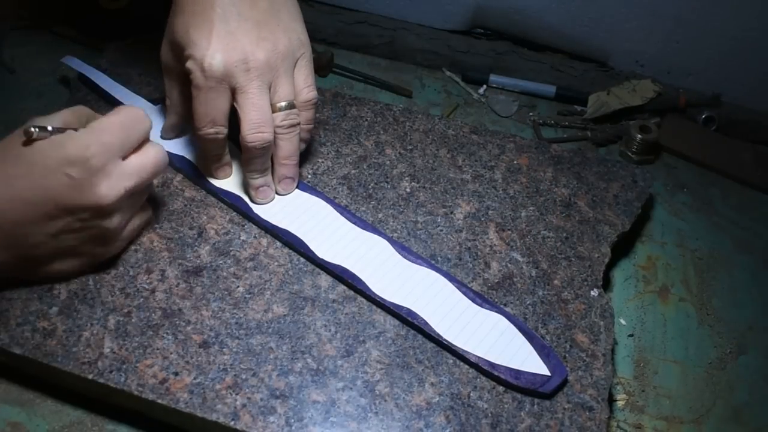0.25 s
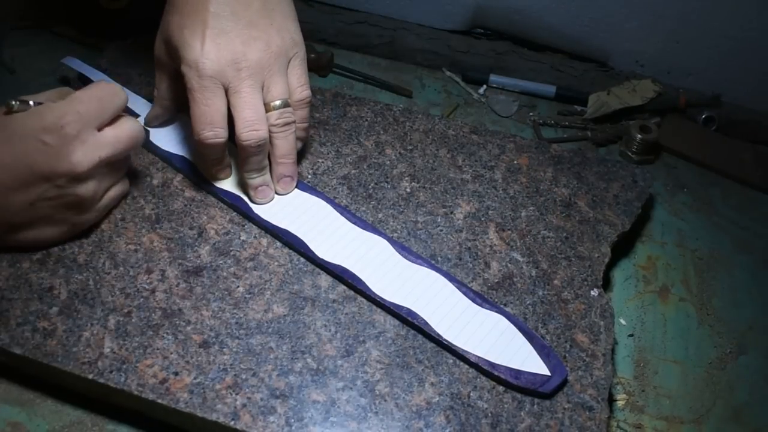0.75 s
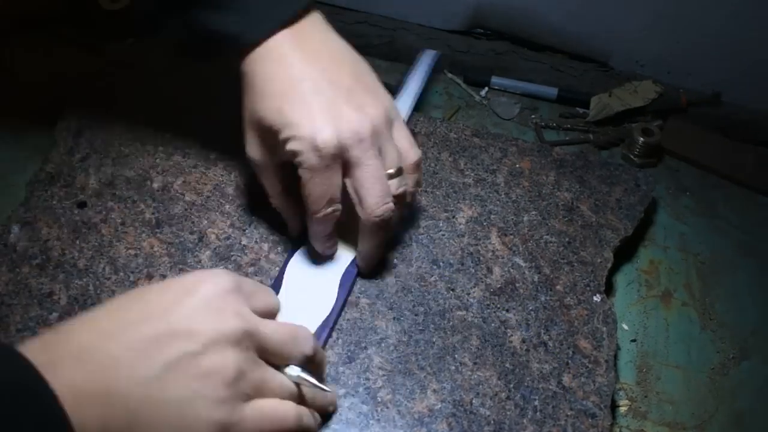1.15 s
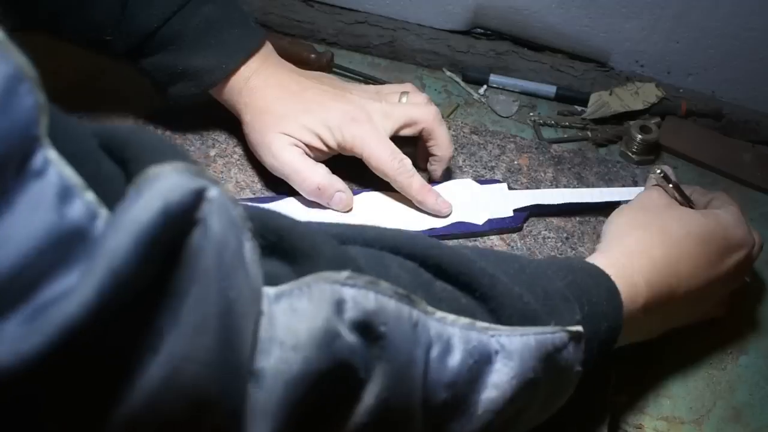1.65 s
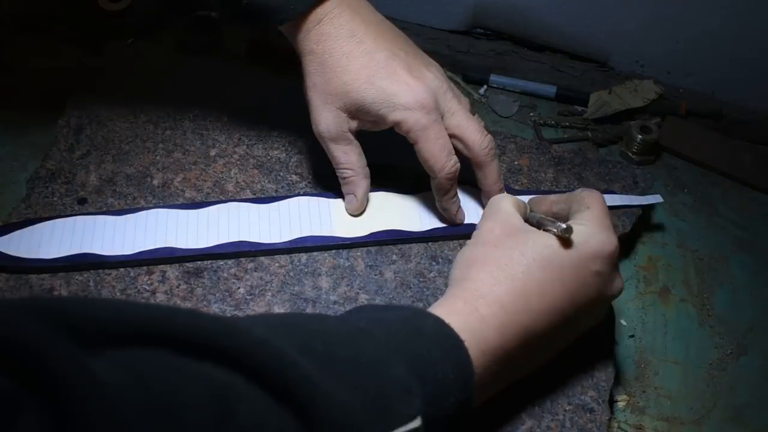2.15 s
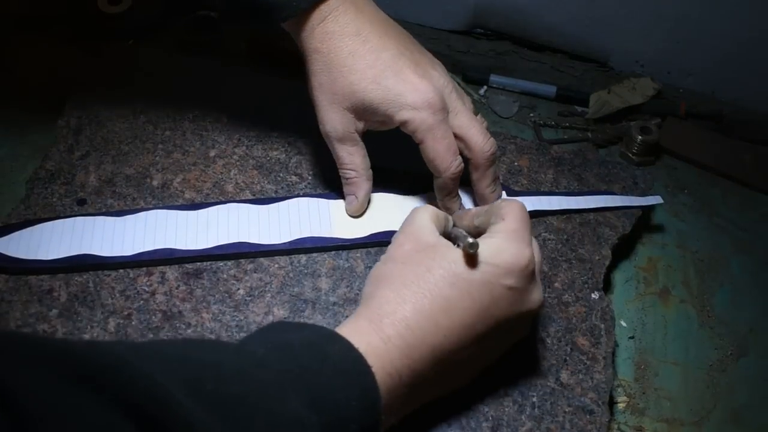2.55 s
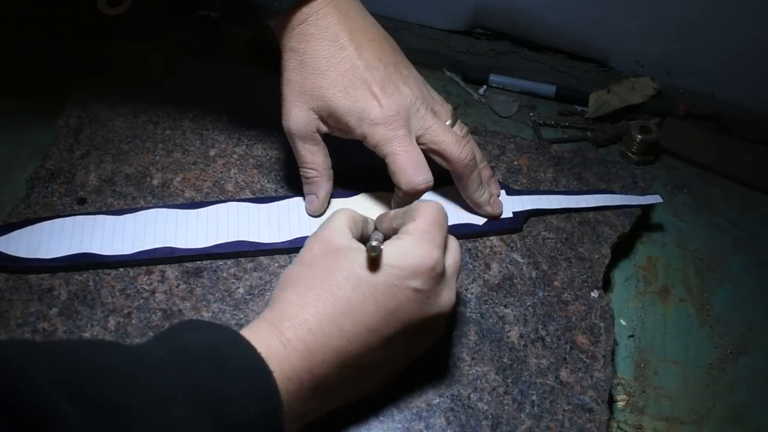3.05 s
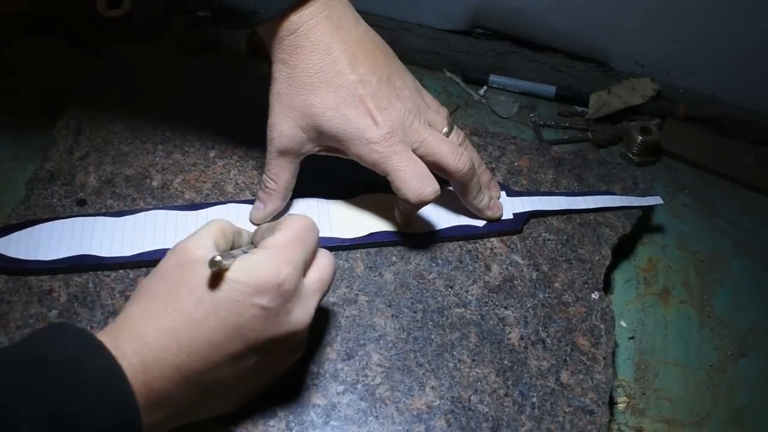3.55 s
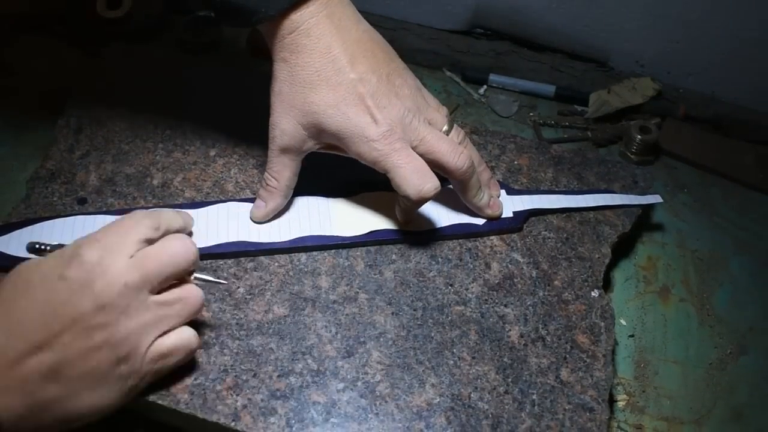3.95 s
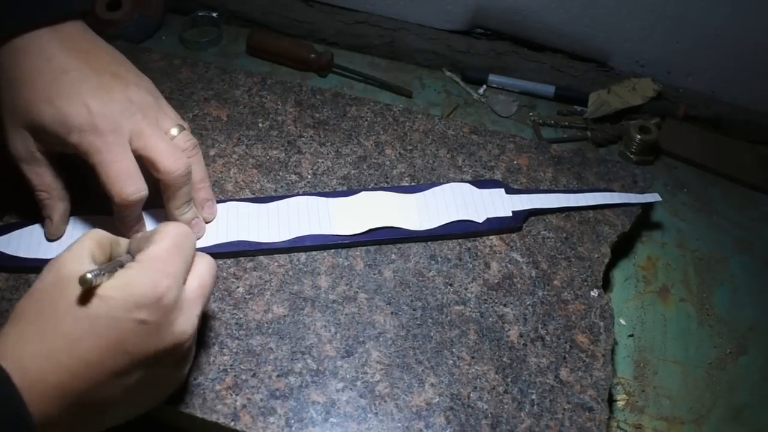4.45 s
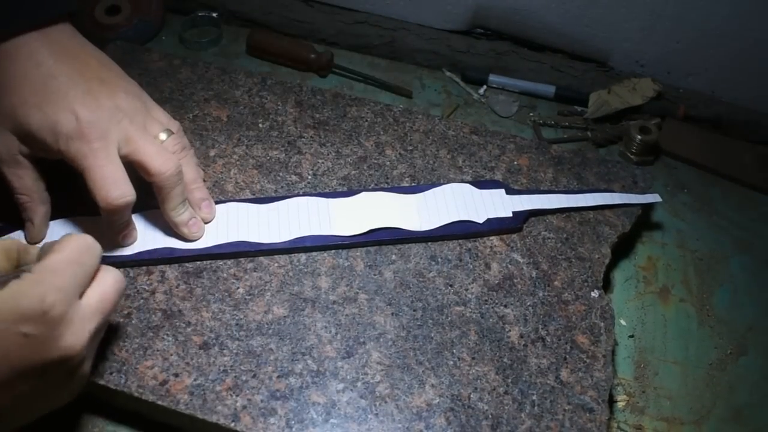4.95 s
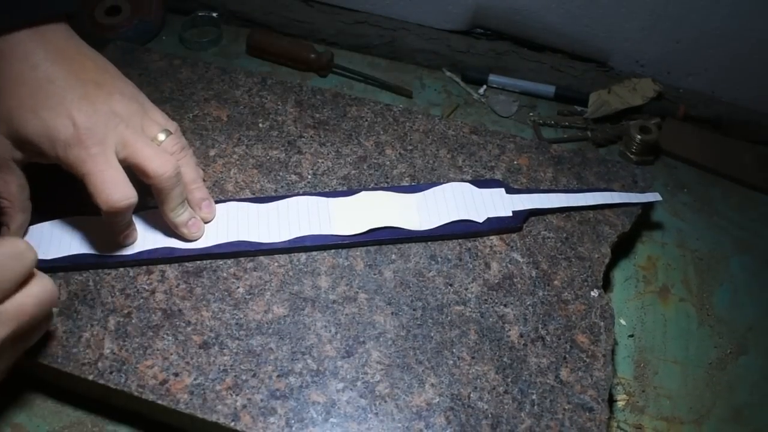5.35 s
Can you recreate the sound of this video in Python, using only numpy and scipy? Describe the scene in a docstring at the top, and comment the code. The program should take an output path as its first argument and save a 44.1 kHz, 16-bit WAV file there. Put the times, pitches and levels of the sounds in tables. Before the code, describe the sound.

Close, dry scratching of a steel point on steel, fast gritty ticking strokes, one loud metallic clack, light bench taps, piercing chirps at the end.

```python
"""Close by in a small, quiet workshop, a metal scribe traces a template on a steel blank under a rustling sleeve.
Stick-slip friction at the point gives bursts of modulated noise, which excite the resonances of the steel.
At about one second the blank slides, skids and is swung round with a clack: impulses and a rattle through modes.
Then it taps the bench in double knocks of damped modes, fingers creak in rising tones, and long strokes follow.
At last the hand drags in low filtered noise, and near the tip the slips squeak as short wavering harmonic tones."""
import sys
import numpy as np
from scipy import signal
from scipy.fft import rfft, irfft
from scipy.io import wavfile
from scipy.ndimage import uniform_filter1d

SR = 44100
rng = np.random.default_rng(int(sys.argv[2]) if len(sys.argv) > 2 else 0)


def store_wav(level_fs):
    """Save 16-bit WAV to argv[1]."""
    pcm = np.round(np.clip(np.atleast_2d(level_fs), -1, 1) * 32767)
    wavfile.write(sys.argv[1], SR, pcm.T.astype(np.int16))


N = 246519
TIME = np.arange(N) / SR  # s
BINS = np.arange(2049) * SR / 4096  # Hz

# Levels in the tables are relative: they come ahead of the filters and of each source's trim.
# width_hz is the full width of a resonance at half its amplitude; length_ms is that of a burst at half power.

# Spectrum of the workshop air: hz, density_db (per Hz)
AIR_SPECTRUM = [(20, 9), (45, -3), (80, -8), (120, -23), (250, -27), (420, -7), (700, -3), (1400, -3.5),
                (2300, -2.5), (4000, -6), (7000, -3.5), (15500, -11.5)]
AIR_DB = -66.5
# Resonances of the sleeve cloth: hz, width_hz, level_db
CLOTH_MODES = [(687, 240, -12.5), (1466, 620, -6), (3480, 790, -2.5), (4210, 3200, -9), (8260, 4600, -17),
               (13300, 3200, -11)]
# Swishes of the sleeve as the arm shifts: top_s, level_db, length_ms
SWISHES = [(0.5, -71, 250), (1.08, -67, 60), (1.28, -67, 50), (1.41, -66, 110), (1.6, -67, 50),
           (1.89, -68, 50), (2.17, -68, 170), (2.41, -67, 60), (3.17, -66, 120), (3.92, -68, 160),
           (4.19, -67, 70), (4.6, -70, 150), (4.98, -65, 150), (5.33, -70, 150)]
SLEEVE_DB = -73  # the sleeve never quite rests

# The point feels for the template's edge with faint ticks: start_s, end_s, rate_per_s, level_db
FEELING = [(0.0, 0.96, 14, -57), (2.02, 2.73, 8, -59)]
# The point is set down or touches in passing, and at 4.012 s the blank knocks sharply on the bench: top_s,
# level_db, length_ms
TOUCHES = [(0.024, -45, 10.6), (0.371, -49, 2.7), (0.388, -51, 4.8), (0.421, -43, 1.8), (0.434, -49, 5),
           (0.462, -43.5, 1.4), (0.473, -49, 8.4), (0.517, -50, 1.3), (0.974, -42, 3), (0.983, -45, 7),
           (1.447, -47.5, 5.8), (1.504, -38, 5.1), (1.546, -38.5, 2), (1.566, -39, 2.3),
           (1.575, -43.5, 4.9), (1.752, -43.5, 4.4), (2.243, -44.5, 5.4), (2.351, -48.5, 3.1),
           (2.821, -47, 5), (4.012, -33.5, 0.77)]
# Strokes, each a run of stick and slip: first_slip_s, last_slip_s, first_level_db, last_level_db,
# slip_length_ms, catch_level_db (re the slips)
STROKES = [(0.100, 0.243, -40.5, -39.5, 5.6, -7), (0.569, 0.665, -36.5, -41.5, 5.5, -4),
           (0.751, 0.777, -42.5, -52, 5, 3), (0.828, 0.902, -39, -37, 4.5, 1),
           (1.926, 2.019, -48, -41, 5, -12), (2.078, 2.099, -45.5, -43.5, 4.5, -6),
           (2.173, 2.203, -55, -55, 4, -8), (2.465, 2.606, -44, -50, 5.5, -10),
           (2.662, 2.686, -47.5, -49, 4.7, -9), (2.857, 3.921, -46.5, -46.5, 5.2, -8),
           (4.272, 4.488, -44.5, -45, 6, -6), (4.544, 4.620, -45.5, -43, 5.3, -6),
           (4.693, 4.742, -44, -45, 5.5, -9), (4.811, 4.967, -41.5, -45, 7, -7),
           (5.030, 5.135, -39, -41, 5, -9), (5.280, 5.334, -37.5, -34, 2.8, -10),
           (5.390, 5.438, -39, -35.5, 3, -10), (5.487, 5.537, -42, -36, 4, -7)]
# Pace of slipping, slower in the bends of the outline and towards the tip: time_s, slips_per_s
PACE = [(0, 42), (2.65, 42.5), (2.85, 46), (3.22, 46), (3.29, 41), (3.45, 41.3), (3.51, 46.5), (3.65, 44.5),
        (3.71, 39.5), (4.4, 41.5), (4.85, 38.5), (5.5, 39.5)]
# Harder or lighter bearing of the hand in the long stroke: time_s, change_db
PRESS = [(2.86, 0), (3.1, 3.5), (3.15, -3), (3.33, 2.5), (3.46, 2.5), (3.52, -2.5), (3.62, 3.5), (3.9, 3.2),
         (4.0, 0)]
SLIP_SCATTER_DB, LENGTH_SCATTER = .9, .15  # spread of the level and of the log length of slips
CATCH_MS, CATCH_SCATTER_DB = 3.0, 2  # typical length and level spread of the light catches
CATCH_SHARE = .49  # a catch comes about this share of the way to the next slip
# Skids of the point while the blank is swung round: top_s, level_db, rise_db_per_ms, fall_db_per_ms
SKIDS = [(1.140, -43, .75, .2), (1.142, -26, 6, .7), (1.213, -22.5, 3, 1.3), (1.226, -34, 1, .5)]
# Spans of steady grip at tang, turn, shoulder, middle and tip: start_s, end_s
PLACES = [(0, 1.0), (1.1, 1.8), (1.9, 3.35), (3.7, 4.05), (4.25, 5.6)]
# Resonances of scribe and blank: hz, width_hz, tang_db, turn_db, shoulder_db, middle_db, tip_db
STEEL_MODES = [(710, 164, -20, -36, -12, -20, -27), (1480, 620, -20.5, -19, -14, -16, -14),
               (2477, 354, -22, -12.5, -18.5, -23, -12), (3790, 2100, -37, -17, -21.5, -20.5, -15),
               (5560, 520, -55, -14, -17.5, -20, -1), (6430, 273, 4, 3.5, 3.5, 4, 5),
               (6950, 660, -4, -3.5, -36, -8, -26), (7410, 1050, -14.5, -15, -9, -10, -15),
               (9110, 1050, -18, -14.5, -13, -15, -6.5), (10370, 630, -11, -13, -6, -7.5, 1.5),
               (11095, 340, -2.5, -5, -3.5, -16, 2.5), (12040, 330, -5, 0, -5, -4, 2),
               (12480, 520, -20, 3.5, 4.5, 1, -.5), (13550, 560, -30, -5, 1.5, 0, -11),
               (14550, 600, -25, -6, -7, -6, -8.5), (15570, 340, -8.5, 4.5, 1.5, -8, -7)]
# Low bending modes of the blank, which ring on between slips: hz, width_hz, level_db
BENDING_MODES = [(430, 110, -16), (670, 220, -5), (1140, 260, -1), (1400, 400, 1), (1720, 300, -6)]
# How freely the blank bends along the blade: time_s, level_db (re the slips)
BENDING_FREEDOM = [(0, -19.5), (1.2, -25.5), (2.0, -12), (2.9, -12.5), (3.4, -9), (3.9, -14.5),
                   (4.4, -11.5), (5.0, -9.5), (5.5, -9.5)]

# The blank slides on its flat side during the turn: time_s, level_db
SLIDE = [(1.0, -100), (1.06, -62.5), (1.11, -67), (1.14, -39.5), (1.165, -53), (1.2, -79), (1.25, -100)]
# Contacts as the blank comes down hard and bounces: time_s, level_db
CLACKS = [(1.2014, -13.5), (1.2022, -24.5), (1.2027, -24), (1.2101, -29), (1.2142, -36)]
# Resonances of the clack's blow: hz, width_hz, level_db
CLACK_MODES = [(260, 320, -50), (694, 630, -21.5), (1680, 360, -2), (2780, 320, -0.5), (3155, 350, 6.5),
               (4340, 1500, -10.5), (5650, 560, 1.5), (6700, 510, 0.5), (7830, 440, 1), (9150, 1300, -6.5),
               (12900, 5000, -10)]
# After-ring of the clack: hz, level_db, t60_s
CLACK_RING = [(1007, -39, .12), (1665, -34, .03), (2831, -30, .025), (6449, -33, .08)]
# The blank tips under the hand and taps the bench: time_s, level_db
TAPS = [(1.369, -50.5), (1.5452, -46.5), (1.5855, -45), (1.642, -55), (1.8418, -40), (1.8487, -40),
        (2.1235, -39), (2.7563, -40.5), (3.3594, -45.5), (3.3905, -42.5), (3.4339, -38.5), (4.0115, -52)]
# The blank rocks with every slip as the long stroke starts: first_tap_s, last_tap_s, first_level_db, last_level_db
ROCKING = (2.862, 3.043, -41, -41.5)
# Modes of a tap: hz, level_db
BENCH_MODES = [(480, -12), (700, -7.5), (1000, -3.5), (1400, 1.5), (1900, -1), (2450, -12.5), (3500, -6.5),
               (4700, -13), (6300, -17.5), (10000, -20.5)]
# Fingers creak on the template: top_s, level_db, length_ms, pitch_hz
CREAKS = [(1.451, -62, 12, 680), (1.592, -66, 31, 1150), (1.759, -60, 9.2, 760), (2.496, -67, 41, 570)]
# The heel of the hand drags over the bench: time_s, level_db
DRAG = [(4.3, -105), (4.5, -87), (4.78, -89), (4.86, -76), (4.97, -72), (5.05, -105)]
# Runs of squeaks near the tip: first_squeak_s, last_squeak_s, first_level_db, last_level_db, length_ms
SQUEAKS = [(5.037, 5.118, -22, -21.5, 1.9), (5.288, 5.342, -21.5, -18.7, 1.7),
           (5.398, 5.444, -26, -20, 1.9), (5.499, 5.544, -35, -23.5, 3)]
# Spectrum of the grit inside a squeak: hz, level_db
RASP_SPECTRUM = [(500, -25.5), (1300, 4), (2000, -4), (4500, -3), (5700, 9), (7100, 9), (8300, -7),
                 (10500, 3), (12600, 4), (15500, -23)]
SQUEAK_HZ, SQUEAK_SAG_HZ = 6510, 260  # mean pitch of the first squeak of a run, and its fall by the last
TOP_HZ = 15950  # upper limit of the sound


def undb(db):
    """Logarithmic level: twenty decibels are a factor of ten in amplitude."""
    return 10 ** (np.asarray(db) / 20)


def unit(x):
    """Normalization: the root mean square becomes 1."""
    return x / np.sqrt(np.mean(x ** 2))


def through(x, response):
    """Linear filtering: a sound is convolved with an impulse response."""
    return signal.fftconvolve(x, response)[:N]


def causal(gain):
    """Minimum phase: folding the cepstrum puts the energy of a unit-energy response as early as possible."""
    cepstrum = irfft(np.log(gain + 1e-6))
    half = len(cepstrum) // 2
    cepstrum[1:half] *= 2
    cepstrum[half + 1:] = 0
    response = irfft(np.exp(rfft(cepstrum)))[:half]
    return response / np.linalg.norm(response)


def body(modes):
    """Modal resonance: the powers of steep-sided peaks (hz, width_hz, level_db) add."""
    power = 0
    for hz, width, db in modes:
        peak = undb(db) / (1 + (2 * (BINS - hz) / width) ** 2)
        power = power + peak ** 2
    return causal(np.sqrt(power))


def colour(points):
    """Spectral shaping: levels (hz, level_db) are joined along a logarithmic frequency axis."""
    hz, db = np.transpose(points)
    return causal(undb(np.interp(np.log(BINS + 1), np.log(hz), db)))


def walk(rate):
    """Random modulation: independent levels, about rate per second, joined by straight lines; rms 1."""
    hold = int(SR / rate) + 1
    levels = np.repeat(rng.standard_normal(N // hold + 1), hold)[:N]
    return unit(uniform_filter1d(levels, hold))


def grit(rate, rough_db):
    """Clustered fracture noise: white noise swells and fades at random, as tiny fractures cluster; rms 1."""
    return unit(rng.standard_normal(N) * undb(rough_db * np.clip(walk(rate), -2, 2)))


def curve(rows):
    """Slow amplitude modulation: the level moves linearly in dB between rows (time_s, level_db)."""
    return undb(np.interp(TIME, *np.transpose(rows)))


def swells(rows, lead=2, edge_ms=0.14):
    """Burst envelopes: the powers of bells (top_s, level_db, length_ms) add, cut in lead lengths before the top."""
    power = np.zeros(N)
    for s, db, ms in rows:
        near = slice(*np.searchsorted(TIME, [s - ms / 400, s + ms / 400]))  # 2.5 lengths each way
        age_ms = 1000 * (TIME[near] - s)
        onset = np.clip((age_ms + lead * ms) / edge_ms, 0, 1)
        power[near] += (undb(db) * onset) ** 2 * .5 ** ((2 * age_ms / ms) ** 2)
    return np.sqrt(power)


def blows(rows):
    """Impulsive excitation: each level is that of the impulse's energy spread over a millisecond."""
    x = np.zeros(N)
    for s, db in rows:
        x[int(s * SR)] += undb(db) * np.sqrt(SR / 1000)
    return x


def tail(t60_s):
    """Dense decay: exponentially dying noise stands for many modes, at unit energy."""
    t = TIME[:SR // 2]
    response = rng.standard_normal(len(t)) * np.exp(-np.log(1000) * t / t60_s)
    return response / np.linalg.norm(response)


def air():
    """Background noise: shaped white noise whose level drifts slightly is the air of the workshop."""
    return undb(AIR_DB + .8 * walk(4.7)) * through(rng.standard_normal(N), colour(AIR_SPECTRUM))


def workshop(x, early_db=-16, late_db=-26):
    """Reverberation: quick reflections from the bench top, then the dull tail of a small room."""
    early_colour = colour([(300, 7.5), (1400, 4.5), (3000, -12.5), (6400, -9), (15000, -33.5)])
    late_colour = colour([(200, 8.5), (1300, -6), (3000, 0), (6400, -17), (15000, -11)])
    early = through(through(x, tail(t60_s=0.081)), early_colour)
    late = through(through(x, tail(t60_s=0.39)), late_colour)
    return x + undb(early_db) * early + undb(late_db) * late


def sleeve():
    """Friction of cloth: rough noise, swelling in swishes, passes through broad resonances."""
    motion = np.hypot(undb(SLEEVE_DB), swells(SWISHES))
    return undb(3.5) * through(motion * grit(rate=220, rough_db=4.5), body(CLOTH_MODES))


def ticks(spread_db=3, length_ms=1.8):
    """Random contact: faint ticks (top_s, level_db, length_ms) fall at uniformly random times."""
    rows = []
    for start, end, rate, db in FEELING:
        for _ in range(int(rate * (end - start))):
            rows.append((rng.uniform(start, end), db + spread_db * rng.standard_normal(), length_ms))
    return rows


def slip_run(first, last, first_db, last_db):
    """Stick-slip timing: the accumulated pace spaces the slips; their levels run evenly from first to last."""
    t = np.linspace(first, last, 200)
    cycles = np.cumsum(np.interp(t, *np.transpose(PACE))) * (t[1] - t[0])
    count = max(int(round(cycles[-1])), 1) + 1
    times = np.interp(np.linspace(cycles[0], cycles[-1], count), cycles, t)
    return times, np.linspace(first_db, last_db, count)


def slips():
    """Stick-slip friction: paced slips with a light catch between two, all varied; top_s, level_db, length_ms."""
    rows = []
    for *stroke, ms, catch_db in STROKES:
        s, db = slip_run(*stroke)
        db = db + np.interp(s, *np.transpose(PRESS))
        size, length, catch_size, catch_time = rng.standard_normal((len(s), 4)).T
        rows += zip(s, db + SLIP_SCATTER_DB * size, ms * np.exp(LENGTH_SCATTER * length))
        between = s[:-1] + np.diff(s) * (CATCH_SHARE + .04 * catch_time[:-1])
        catch_levels = db + catch_db + CATCH_SCATTER_DB * catch_size
        rows += zip(between, catch_levels, CATCH_MS * np.exp(-LENGTH_SCATTER * length))
    return rows


def skids():
    """Sliding contact: the envelope of each skid rises and falls exponentially, and their powers add."""
    power = 0
    for s, db, rise, fall in SKIDS:
        age_ms = 1000 * (TIME - s)
        power = power + undb(db - np.maximum(-rise * age_ms, fall * age_ms)) ** 2
    return np.sqrt(power)


def scribe(tilt_db=1.0):
    """Forced vibration: slips, touches, ticks and skids drive the steel, whose resonances change with the grip."""
    contact = swells([*slips(), *TOUCHES, *ticks()], lead=0.9)
    force = np.hypot(contact, skids()) * grit(rate=1800, rough_db=4.0)
    modes = np.array(STEEL_MODES)
    ringing = 0
    for place, here in enumerate(np.eye(len(PLACES))):
        # crossfade from one place to the next
        grip = np.interp(TIME, np.ravel(PLACES), np.repeat(here, 2))
        ringing = ringing + through(force * grip, body(modes[:, [0, 1, place + 2]]))
    # the angle of the point rocks, so some slips are brighter than others
    low = signal.sosfiltfilt(signal.butter(4, 9000, fs=SR, output="sos"), ringing)
    tilt = undb(tilt_db * walk(120))
    tilted = low / tilt + (ringing - low) * tilt
    bending = through(through(force * curve(BENDING_FREEDOM), tail(t60_s=0.094)), body(BENDING_MODES))
    return undb(0.61) * tilted + undb(-2.5) * bending


def slide():
    """Sliding friction: the steel hisses over the bench as rough noise through three resonances."""
    modes = [(1280, 300, -3), (3460, 640, 7), (5070, 1500, 5.5)]
    return through(curve(SLIDE) * grit(rate=950, rough_db=3.5), body(modes))


def clack(rattle_db=-4, rattle_ms=11):
    """Impact: hard blows and a rattle, soon stopped by the hand, excite broad modes; decaying sines ring after."""
    start = CLACKS[0][0]
    rattle = swells([(start + 0.0011, -25, rattle_ms)]) * (TIME > start) * grit(rate=2500, rough_db=0)
    blow = through(blows(CLACKS) + undb(rattle_db) * rattle, body(CLACK_MODES))
    age = np.maximum(TIME - start, 0)
    ring = 0
    for hz, db, t60 in CLACK_RING:
        ring = ring + undb(db) * np.sin(2 * np.pi * hz * age) * np.exp(-np.log(1000) * age / t60)
    return undb(2) * blow + ring


def taps(bounce_s=0.00223, bounce_db=2.0, spot_db=1.3):
    """Damped double impact: blank meets bench twice in quick succession; each spot varies the dry modes."""
    out = np.zeros(N + SR)
    loss = .24  # width of a mode as a share of its nominal frequency: the fingers damp it
    for s, db in [*TAPS, *zip(*slip_run(*ROCKING))]:
        chance = rng.standard_normal((len(BENCH_MODES), 2))
        modes = []
        for (hz, gain), (shift, size) in zip(BENCH_MODES, chance):
            modes.append((hz * (1 + .05 * shift), hz * loss, gain + spot_db * size))
        # two contacts over a short dense decay
        force = tail(t60_s=.04)[:len(BINS)]
        force[0] += 1
        force[int(bounce_s * SR)] += undb(bounce_db)
        tap = signal.fftconvolve(force, body(modes)) * np.sqrt(SR / 1000)
        out[int(s * SR):][:len(tap)] += undb(db) * tap
    return out[:N] * undb(-2.4)


def creaks(rise_per_s=1.4, wander=0.082):
    """Stick-slip of skin: each creak on the template is a brief sine, roughened by pitch jitter and rising."""
    out = 0
    jitter = wander * walk(400)
    for s, db, ms, hz in CREAKS:
        glide = np.clip(rise_per_s * (TIME - s), -.03, .03)
        phase = 2 * np.pi * np.cumsum(hz * (1 + glide + jitter)) / SR
        out = out + swells([(s, db, ms)]) * np.sqrt(2) * np.sin(phase)
    return out


def drag():
    """Friction of skin: noise through two low resonances gives the burr of the hand on the bench."""
    return through(curve(DRAG) * rng.standard_normal(N), body([(195, 50, 0), (400, 150, -20)]))


def squeaks(wander=0.0214, octave_db=-21, grit_db=-14, after_ms=2.2, after_db=-9):
    """Frictional chatter: the point breaks loose at one wavering pitch, with octave and grit, falling over a run."""
    rows = []
    for *run, ms in SQUEAKS:
        times, levels = slip_run(*run)
        pitches = SQUEAK_HZ - SQUEAK_SAG_HZ * np.linspace(0, 1, len(times))
        rows += [(s, db, ms, hz) for s, db, hz in zip(times, levels, pitches)]
    rows = np.array(rows)
    hz = np.interp(TIME, rows[:, 0], rows[:, 3]) * (1 + wander * walk(900))
    phase = 2 * np.pi * np.cumsum(hz) / SR
    tone = np.sqrt(2) * (np.sin(phase) + undb(octave_db) * np.sin(2 * phase))
    rasp = through(grit(rate=1500, rough_db=1.5), colour(RASP_SPECTRUM))
    # a weaker second burst draws out each squeak
    dying = [(s + after_ms / 1000, db + after_db, ms) for s, db, ms, _ in rows]
    envelope = swells([*rows[:, :3], *dying], lead=.75, edge_ms=0.43)
    return envelope * (undb(-1.9) * tone + undb(grit_db) * rasp)


def scene(clack_room_share=0.51):
    """Superposition: all sources sound in the room over its air; the clack sends only a share to the reverberation."""
    blow = clack()
    work = sleeve() + scribe() + slide() + taps() + creaks() + drag() + squeaks()
    in_room = workshop(work + clack_room_share * blow)
    return (in_room + (1 - clack_room_share) * blow + air())[None]


def record(dry, low_cut_hz=110):
    """Band limiting: the small microphone thins the bass, and the recorder's steep low-pass cuts the top."""
    thin = signal.sosfilt(signal.butter(1, low_cut_hz, "high", fs=SR, output="sos"), dry)
    return signal.sosfilt(signal.ellip(10, .2, 80, TOP_HZ, fs=SR, output="sos"), thin)


dry = scene()
out = record(dry)
store_wav(out)
```